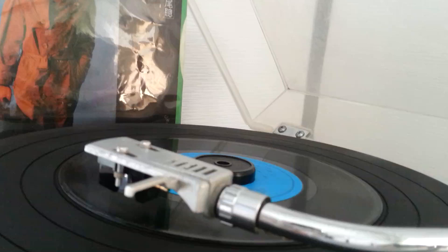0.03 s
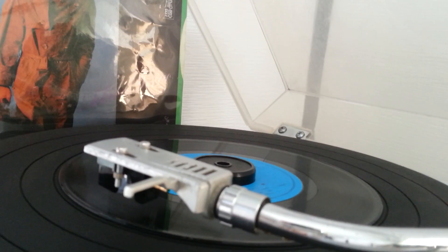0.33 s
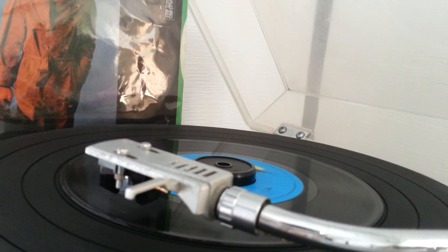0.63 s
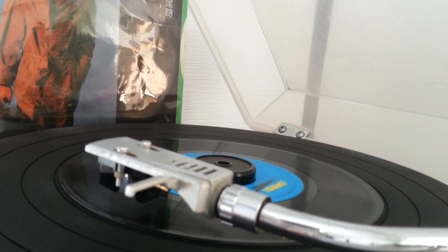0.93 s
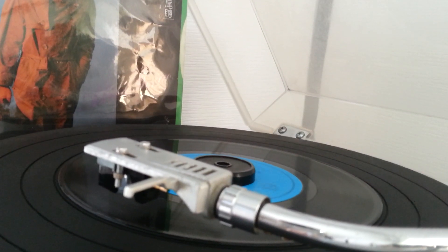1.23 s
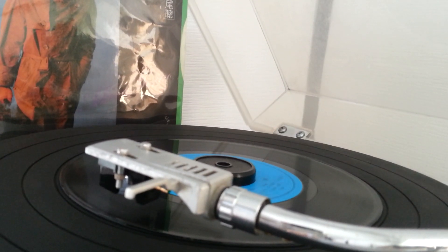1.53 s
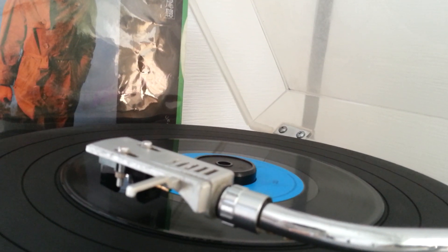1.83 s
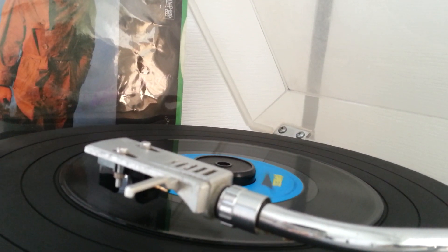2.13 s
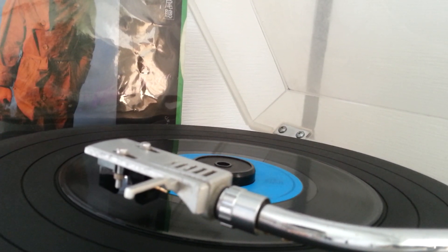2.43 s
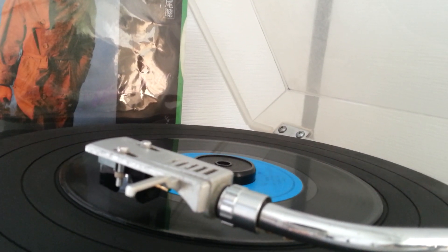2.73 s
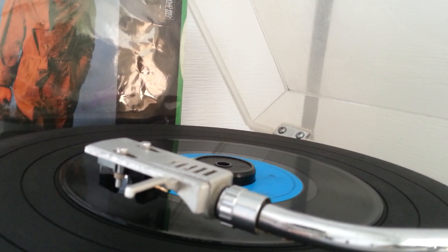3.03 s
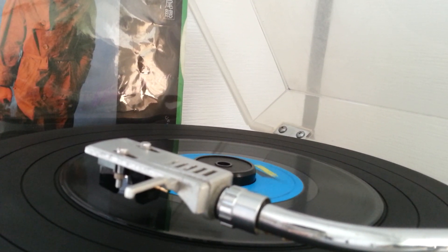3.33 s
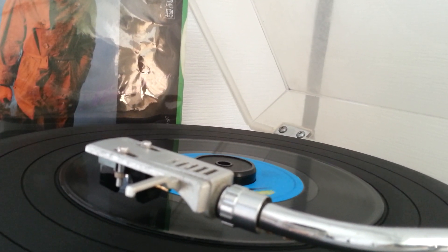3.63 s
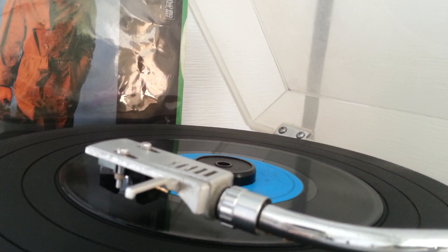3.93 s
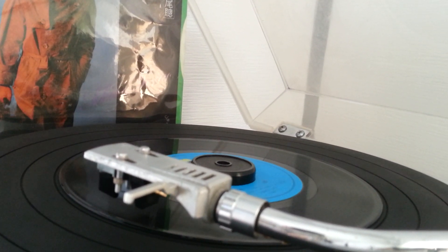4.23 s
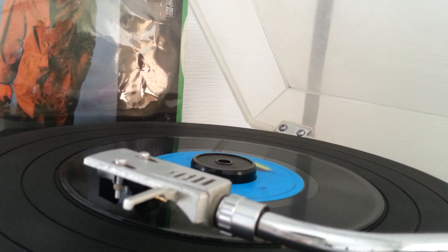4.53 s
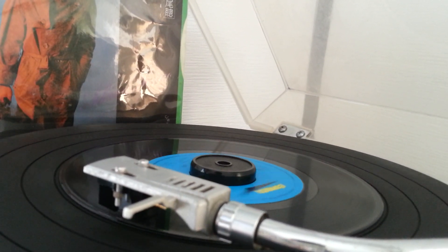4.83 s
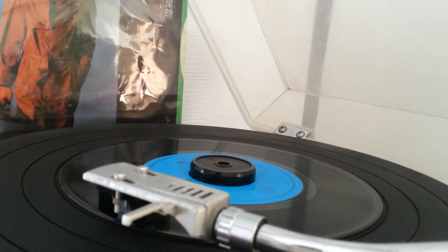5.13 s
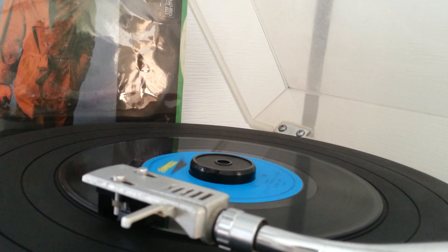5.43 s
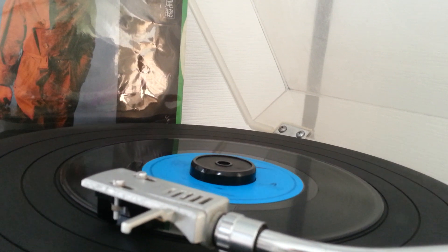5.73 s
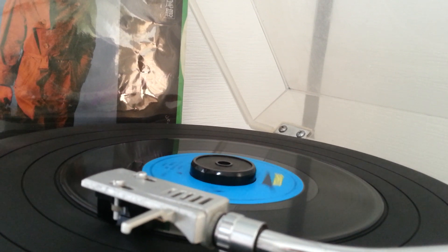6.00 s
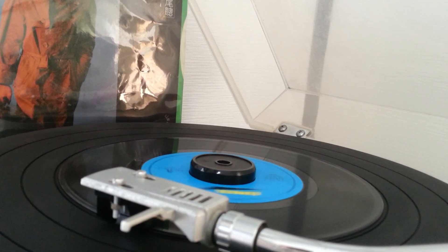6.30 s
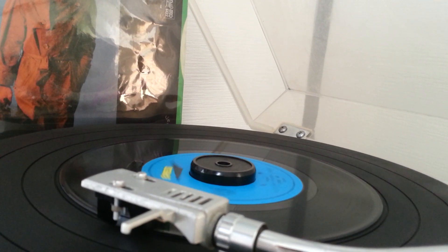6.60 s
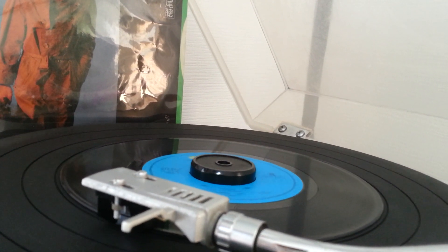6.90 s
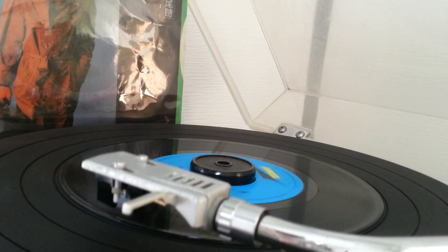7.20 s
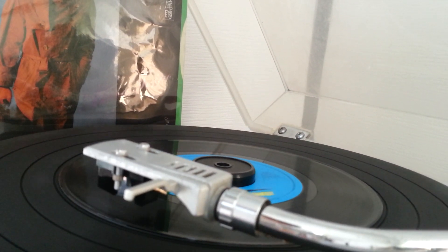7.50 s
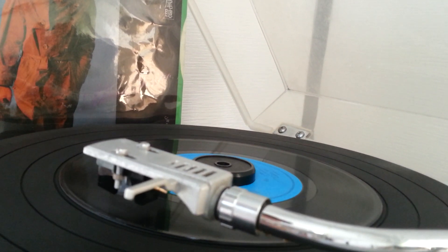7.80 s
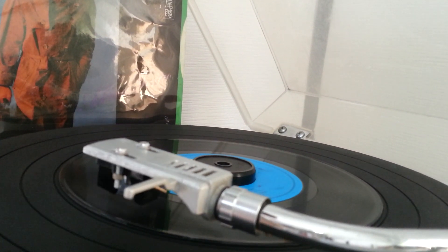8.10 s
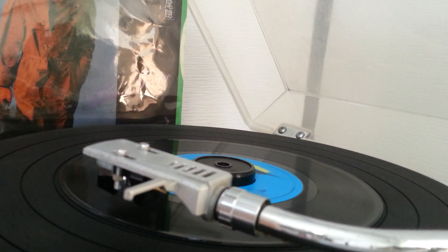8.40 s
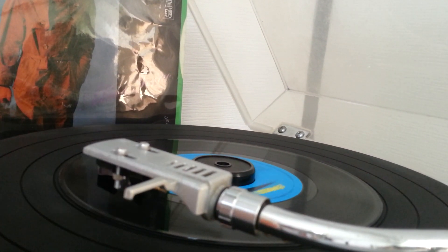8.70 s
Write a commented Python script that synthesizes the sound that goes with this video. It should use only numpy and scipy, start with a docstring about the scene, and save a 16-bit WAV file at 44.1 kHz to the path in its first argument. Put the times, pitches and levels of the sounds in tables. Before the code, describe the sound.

After a short silence, a turntable's low, steady motor hum comes in at about 0.8 seconds, close by in a quiet room, with faint hiss and two light, dry ticks. At about 3.9 seconds a small spring rings thinly and the stylus is knocked out of the groove with a quick clatter and a short zip, followed by a soft thump. From about 5.4 seconds the stylus knocks down and scrapes across the spinning paper label, a rough, hissing rasp with small knocks and a low rumble through the arm and lid, strongest around 6 seconds. The scrape ends near 7 seconds. At 7.2 seconds the arm lands back on the record with a loud, sharp clack, the loudest moment. The hum continues alone, with two more light ticks at about 8.2 and 8.8 seconds.

```python
"""Stylus knocked onto the label

A turntable runs under its open lid in a quiet room, its motor humming through the plinth.
The deck ticks, a spring rings, and at 3.9 s the stylus is knocked out of the run-out groove.
From 5.4 s it scrapes over the paper label for 1.5 s, fibres snagging the tip and ringing arm and lid.
At 7.2 s the arm lands back on the record with a loud clack of tip, headshell and platter."""
import sys
import numpy as np
from scipy import signal
from scipy.fft import rfft, irfft, next_fast_len
from scipy.io import wavfile

SR = 44100
rng = np.random.default_rng(int(sys.argv[2]) if len(sys.argv) > 2 else 0)


def to_wav(s):
    """Save 16-bit WAV."""
    ch = np.atleast_2d(s).T  # columns
    pcm = np.round(np.clip(ch, -1, 1) * 32767)  # PCM
    wavfile.write(sys.argv[1], SR, pcm.astype(np.int16))


N = 394694
T = np.arange(N) / SR
FFT_SIZE = next_fast_len(N + 8192)
HZ = np.maximum(np.fft.rfftfreq(FFT_SIZE, 1 / SR), 1)

# Noise spectra: f/Hz, relative density/dB
BEARING_SPECTRUM = [(25, -52), (43, -46), (54, -22), (75, -21.5), (110, -12), (170, -8.5), (240, -4),
                    (370, -3), (440, -7), (780, -3.5), (1100, -11), (1500, -18.5), (1880, -17.5),
                    (2400, -22), (3100, -24.5), (6500, -52)]  # motor and bearing
HISS_SPECTRUM = [(100, 9.5), (4500, 4), (6200, -1.5), (7800, 1), (14000, 0.5)]  # microphone
DECK_TICK_SPECTRUM = [(500, -21), (2000, -6), (3200, 3), (4500, 2), (6500, -12), (12000, -20)]
TIP_SPECTRUM = [(300, -6), (2500, 4.5), (5000, -0.5), (6500, -8), (8200, 2), (10000, -0.5), (12000, -12),
                (14400, -9)]
CLACK_SPECTRUM = [(90, -55), (165, -28), (240, -18), (500, 6), (1000, 2), (1500, -6.5), (2000, -5),
                  (3200, -10.5), (4800, -18.5), (6500, -31), (12000, -40)]  # headshell
FRICTION_SPECTRUM = [(100, -28), (190, -1.5), (550, -8.5), (1600, -6.5), (3000, -16.5), (5000, -31),
                     (14000, -60)]  # floor between the arm's resonances
PAPER_SPECTRUM = [(2000, -20), (4200, 5.5), (5400, -1), (6700, -3.5), (8400, -6), (10000, -12),
                  (12000, -25), (15000, -92)]
RUMBLE_SPECTRUM = [(25, -40), (42, -26), (62, 2.5), (92, 1), (108, -9), (135, 4), (170, -6.5), (260, -19),
                   (900, -70)]  # shaken arm
# Noise-driven resonances: f/Hz, width/Hz, relative left level/dB, relative right level/dB
PLINTH_BANDS = [(237.5, 47, -0.5, -1), (314, 25, -2.5, 1.5), (495, 20, -25, 2), (653, 77, -15, -3.5),
                (778, 79, -5.5, -13), (991, 40, -7.5, -10), (1850, 47, -24, -11.5), (3100, 230, -23.5, -47)]
SKID_BANDS = [(880, 230, -4, 7), (1070, 170, -5, 1), (1530, 160, -5, -7)]
ARM_BANDS = [(424, 30, 1.5, 3), (550, 16, -14, -22), (686, 127, 2, -2), (825, 76, -8, 1),
             (969, 27, 4.5, -10), (1062, 36, 4, -20), (1192, 55, 3.5, -3), (1328, 66, -3, 2.5),
             (1472, 66, 2.5, -16), (1580, 56, -1, -19), (1823, 38, -1, -20), (2010, 18, 3, -1.5),
             (2235, 170, -27, -2.5), (2450, 93, -1.5, -7.5), (2766, 25, -4, -26), (2890, 37, -15, -5.5),
             (3636, 63, -10.5, -10), (4000, 110, -24, -30), (4674, 140, -10, -30), (5200, 100, -18, -29)]  # arm and lid under friction
CARTRIDGE_BANDS = [(3160, 100, 0.5, -28), (3290, 86, -1, -11)]
LID_BANDS = [(230, 57, 0.46, -5), (276, 7.9, -1, -1), (318, 14.5, -2, 4.5)]
# Struck modes: f/Hz, gain/dB, t60/s, right over left/dB
SPRING_MODES = [(1274, -5.5, 0.84, 10), (1378, -9, .2, 0)]
CANTILEVER_MODES = [(14000, -17, .11, -3), (14130, -19, .1, -3)]
HEADSHELL_MODES = [(590, -15, 0.015, 7), (810, -28.5, 0.029, 3), (940, -24, 0.046, 14),
                   (1135, -13, 0.035, 12), (1360, -8.5, 0.074, 7), (1560, -18, 0.043, -5),
                   (2294, -21, 0.065, 6)]
PLATTER_MODES = [(205, -22.5, 0.15, -10), (272, -10, 0.062, -4), (293.6, -7.5, 0.076, 7.5),
                 (337.7, -16.5, 0.35, 0), (437, -14.5, 0.12, 10), (554, -15, 0.069, 6),
                 (801, -21, 0.073, 11)]  # record and platter
# Motor hum: multiple of shaft speed, level/dB
HUM_HARMONICS = [(4, -80), (6, -58.5), (8, -60.5), (9, -58), (10, -54.5), (11, -56), (13, -60), (14, -54.5),
                 (16, -66.5), (18, -65), (19, -64), (30, -69), (34, -59.5), (35, -59.5)]
# Ticks of the turning deck: t/s, relative level/dB
DECK_TICK_EVENTS = [(0.7785, -44), (0.9388, -45), (8.2317, -45), (8.818, -41.5)]
# Nudges to the spring: t/s, level/dB
SPRING_NUDGES = [(3.855, -50), (3.8954, -43), (3.9166, -49), (3.945, -57)]
# Stylus contacts: t/s, tip level/dB, headshell level/dB, platter level/dB
STYLUS_CONTACTS = [(3.9176, -52, -26, -50), (3.925, -57, -30.5, -28), (3.9355, -45, -30, -41),
                   (3.9418, -60, -44, -16.5), (3.977, -70, -54, -32), (4.136, -75, -55, -27.5),
                   (5.35, -60, -36.5, -42), (5.378, -70, -51, -29), (5.402, -64, -35, -22.5),
                   (5.755, -60, -44, -25), (6.1785, -59, -27, -35), (6.201, -60, -31, -26),
                   (6.624, -62, -25, -20), (6.655, -60, -27, -22), (7.178, -22, -15.5, -18),
                   (7.1816, -26, -23, -16.5), (7.1853, -35, -16, -7.5), (7.192, -44, -27, -20)]
# Bumps in the label: t/s, rumble level/dB
LABEL_BUMPS = [(5.38, -42), (5.915, -35), (6.045, -35), (6.21, -25.5), (6.712, -31.5), (6.94, -36)]
# Likeness of the two ears: f/Hz, coherence/0-1
EAR_COHERENCE = [(60, 1), (150, 0.94), (300, 0.81), (700, 1), (2000, 0.38), (5000, 0.35), (14000, 0)]


def from_db(db):
    """Decibels to gain."""
    return 10 ** (np.asarray(db) / 20)


def unit_rms(x):
    """Scale to unit rms."""
    return x / np.sqrt(np.mean(x ** 2) + 1e-20)


def over_hz(points):
    """Interpolate (f/Hz, value) points on a log-frequency axis."""
    hz, value = np.transpose(points)
    return np.interp(np.log(HZ), np.log(hz), value)


def spectrum(points):
    """Gain per bin of a noise spectrum."""
    return from_db(over_hz(points))


def resonances(bands):
    """Gain per ear and bin; bands add in power."""
    power = sum(from_db([[left_db], [right_db]]) ** 2 / (1 + 2 * ((HZ - hz) / width_hz) ** 2) ** 2
                for hz, width_hz, left_db, right_db in bands)
    return np.sqrt(power)


def white():
    """Two independent noises."""
    return rng.standard_normal((2, N))


def grains(per_s, spread_db):
    """Two trains of random snags of uneven size."""
    sizes = from_db(spread_db * np.minimum(rng.exponential(1, N), 4))
    return unit_rms(white() * sizes * (rng.random(N) < per_s / SR))


def drift(per_s):
    """Random wander, unit rms."""
    knots = rng.standard_normal(4000)
    return unit_rms(np.interp(T * per_s, np.arange(len(knots)), knots))


def burst_power(at_s, db, t60_s):
    """Power envelope of a decaying burst."""
    power, start = np.zeros(N), int(at_s * SR)
    age_s = T[:min(N - start, SR // 2)]
    power[start:start + len(age_s)] = from_db(db - 60 * age_s / t60_s) ** 2
    return power


def stroke(start_s, end_s, rise_db_per_s, fall_db_per_s):
    """Gain of 1 from start_s to end_s, with ramps outside."""
    rise_db = rise_db_per_s * np.clip(start_s - T, 0, 1)
    fall_db = fall_db_per_s * np.clip(T - end_s, 0, 1)
    return from_db(-rise_db - fall_db) + 1e-18


def hump(at_s, width_s):
    """Gaussian of height 1."""
    return np.exp(-np.minimum(((T - at_s) / width_s) ** 2, 50))


def pan(left_db):
    """Ear gains, left over right by left_db."""
    return from_db(np.array([[left_db], [-left_db]]) / 2)


def to_ears(sources, colour, left_lead_ms):
    """Mix two independent signals to partly coherent stereo; colour is normalised."""
    coherence = np.clip(over_hz(EAR_COHERENCE), 0, 1)
    mid, side = rfft(sources, FFT_SIZE)
    pair = np.sqrt((1 + coherence) / 2) * mid + np.sqrt((1 - coherence) / 2) * side * [[1], [-1]]
    lead = np.exp(1j * np.pi * HZ * left_lead_ms / 1000 * [[1], [-1]])
    return irfft(pair * lead * unit_rms(colour), FFT_SIZE)[:, :N]


def ring(blows, hz, t60_s):
    """Two-pole mode: a unit blow starts a decaying unit sine."""
    radius, angle = from_db(-60 / (t60_s * SR)), 2 * np.pi * hz / SR
    return signal.lfilter([0, np.sin(angle)], [1, -2 * radius * np.cos(angle), radius ** 2], blows + 1e-18)


def struck(blows, modes):
    """Blows ring a body too small to radiate deep bass."""
    ringing = sum(from_db(db) * ring(blows, hz, t60_s) * pan(-right_db)
                  for hz, db, t60_s, right_db in modes)
    return signal.sosfilt(signal.butter(6, 185, "high", fs=SR, output="sos"), ringing)


def motor(shaft_hz=22.65):
    """Hum on shaft harmonics; bearing noise rings the plinth and throbs once a turn."""
    shaft_rad = 2 * np.pi * shaft_hz * np.cumsum(1 + 0.00117 * drift(per_s=2.987)) / SR
    hum = np.zeros(N)
    for multiple, db in HUM_HARMONICS:
        amplitude = np.sqrt(2) * from_db(db + 1.8 * drift(per_s=6.6))
        hum += amplitude * np.sin(multiple * shaft_rad + rng.uniform(0, 2 * np.pi))
    throb = 1 + 0.045 * np.sin(shaft_rad)
    colour = np.hypot(spectrum(BEARING_SPECTRUM), resonances(PLINTH_BANDS))
    bearing = to_ears(white() * throb, colour, left_lead_ms=-0.23)
    return hum * pan(left_db=-2.1) + from_db(-42.5) * bearing


def microphone_hiss():
    """Steady self-noise, independent per channel."""
    return irfft(rfft(white(), FFT_SIZE) * spectrum(HISS_SPECTRUM), FFT_SIZE)[:, :N]


def deck_ticks():
    """Light, dry ticks inside the turning deck."""
    power = sum(burst_power(at_s, db, t60_s=0.057) for at_s, db in DECK_TICK_EVENTS)
    return to_ears(white() * np.sqrt(power), spectrum(DECK_TICK_SPECTRUM), left_lead_ms=-0.14)


def spring():
    """Nudges set a spring under the arm ringing thinly."""
    blows = np.zeros(N)
    for at_s, db in SPRING_NUDGES:
        blows[int(at_s * SR)] = from_db(db)
    return struck(blows, SPRING_MODES)


def contacts(crack_over_tick_db=4, ring_over_clack_db=-6):
    """At each contact the tip cracks and ticks, the headshell clacks and rings, the platter thumps."""
    tick_power, clack_power, tip_blows, shell_blows, platter_blows = np.zeros((5, N))
    for at_s, tip_db, shell_db, platter_db in STYLUS_CONTACTS:
        tick_power += burst_power(at_s, tip_db + crack_over_tick_db, t60_s=0.0045)
        tick_power += burst_power(at_s, tip_db, t60_s=0.079)
        clack_power += burst_power(at_s, shell_db, t60_s=0.066)
        start = int(at_s * SR)
        tip_blows[start] = from_db(tip_db)
        shell_blows[start] = from_db(shell_db + ring_over_clack_db)
        platter_blows[start] = from_db(platter_db)
    # the arm's many close modes blur into noise
    tick = to_ears(white() * np.sqrt(tick_power), spectrum(TIP_SPECTRUM), left_lead_ms=0.052)
    clack = to_ears(white() * np.sqrt(clack_power), spectrum(CLACK_SPECTRUM), left_lead_ms=-0.04)
    ringing = struck(tip_blows, CANTILEVER_MODES) + struck(shell_blows, HEADSHELL_MODES)
    thump = struck(platter_blows, PLATTER_MODES)
    return tick * pan(left_db=5) + clack * pan(left_db=0.5) + ringing + thump


def skid(at_s=3.918):
    """A short zip: groove walls pluck the tip in quick succession."""
    force = from_db(-26) * stroke(at_s, at_s, rise_db_per_s=4500, fall_db_per_s=500)
    plucks = grains(per_s=4600, spread_db=2.5) * force
    return to_ears(plucks, resonances(SKID_BANDS), left_lead_ms=-0.12)


def friction(on_vinyl, on_label, bumps, fade_from_s=6.32, fade_db_per_s=26):
    """Fibres snag the tip: the arm rasps, the cartridge rings, the paper hisses. Weaker on vinyl."""
    # grip wanders with the paper's grain and tightens on bumps
    grip = from_db(0.84 * drift(per_s=22) + 0.5 * sum(bumps))
    snags = grains(per_s=14000, spread_db=0.86) * grip * np.hypot(on_label, from_db(-5.5) * on_vinyl)
    fine_snags = grains(per_s=16000, spread_db=-2.5) * grip * np.hypot(on_label, from_db(-13) * on_vinyl)
    arm_colour = np.hypot(spectrum(FRICTION_SPECTRUM), resonances(ARM_BANDS))
    rasp = to_ears(snags, arm_colour, left_lead_ms=0.26)
    fade = from_db(-fade_db_per_s * np.maximum(T - fade_from_s, 0))
    cartridge = to_ears(snags * fade, resonances(CARTRIDGE_BANDS), left_lead_ms=0.23)
    paper = to_ears(fine_snags, spectrum(PAPER_SPECTRUM), left_lead_ms=0.14) * pan(left_db=7)
    return from_db(-30.5) * rasp + from_db(-44) * cartridge + from_db(-45) * paper


def arm_shake(touching, bumps, swell_db=8.5):
    """The dragged arm shakes, most near half-way, and bumps jolt it: it rumbles, the lid booms."""
    wobble = touching * from_db(swell_db * hump(at_s=6.03, width_s=0.22))
    jolts = touching * sum(from_db(db) * bump for (_, db), bump in zip(LABEL_BUMPS, bumps))
    rumble_gain = np.hypot(from_db(-42.5) * wobble, jolts)
    boom_gain = np.hypot(from_db(-41.5) * wobble, from_db(-9) * jolts)
    rumble = to_ears(white() * rumble_gain, spectrum(RUMBLE_SPECTRUM), left_lead_ms=0.063)
    boom = to_ears(white() * boom_gain, resonances(LID_BANDS), left_lead_ms=0.17)
    return rumble + boom


def scrape():
    """The tip grazes smooth vinyl, hops, bites into the bumpy label and lifts off."""
    on_vinyl = stroke(start_s=5.352, end_s=5.416, rise_db_per_s=2495, fall_db_per_s=307)
    on_label = stroke(start_s=5.472, end_s=6.925, rise_db_per_s=418, fall_db_per_s=307)
    touching = np.hypot(on_vinyl, on_label)
    bumps = [hump(at_s, width_s=0.032) for at_s, _ in LABEL_BUMPS]
    return friction(on_vinyl, on_label, bumps) + arm_shake(touching, bumps)


def room(x, t60_s=0.25, wall_hz=5070):
    """Short, dull, diffuse tail, different at each ear."""
    age_s = T[:SR // 2]
    tail = rng.standard_normal((2, len(age_s))) * from_db(-60 * age_s / t60_s) * (age_s > 0.005)
    tail = signal.sosfilt(signal.butter(1, wall_hz, fs=SR, output="sos"), tail)
    return signal.fftconvolve(x, tail / np.sqrt(np.sum(tail ** 2) / 2), axes=1)[:, :N]


def scene():
    """Stereo mix; only contacts and skid feed the room."""
    knocks = contacts() + skid()
    steady = from_db(-59.5) * microphone_hiss() + motor()
    return steady + scrape() + from_db(-5) * deck_ticks() + spring() + knocks + from_db(-14.5) * room(knocks)


def record(dry):
    """The microphone opens after a short silence; deep bass and top are cut."""
    open_s, low_cut_hz, high_cut_hz = 0.778, 36, 14600
    heard = signal.sosfilt(signal.butter(3, low_cut_hz, "high", fs=SR, output="sos"), dry)
    return signal.sosfilt(signal.ellip(12, 0.1, 80, high_cut_hz, fs=SR, output="sos"), heard * (T >= open_s))


dry = scene()
out = record(dry)
to_wav(out)
```